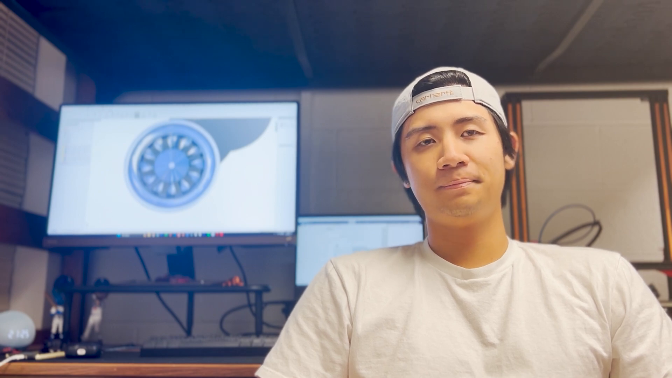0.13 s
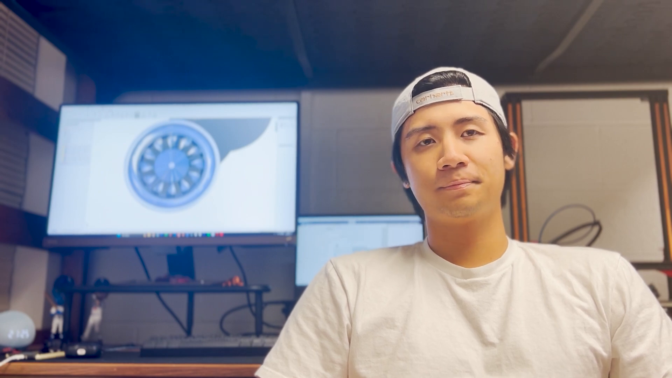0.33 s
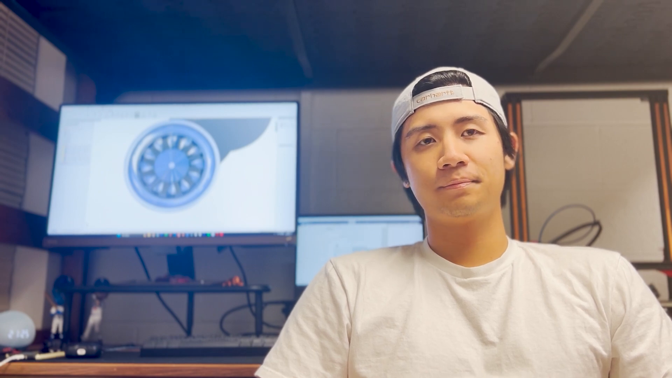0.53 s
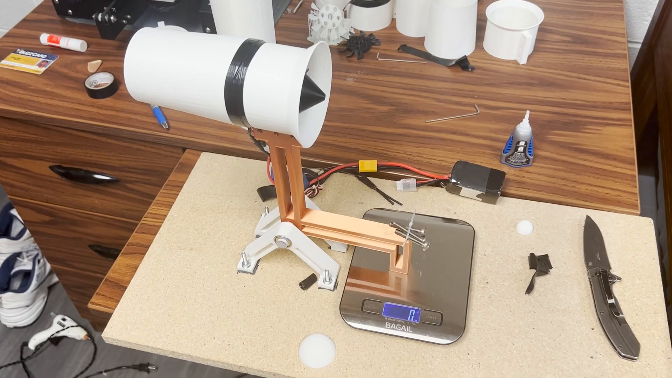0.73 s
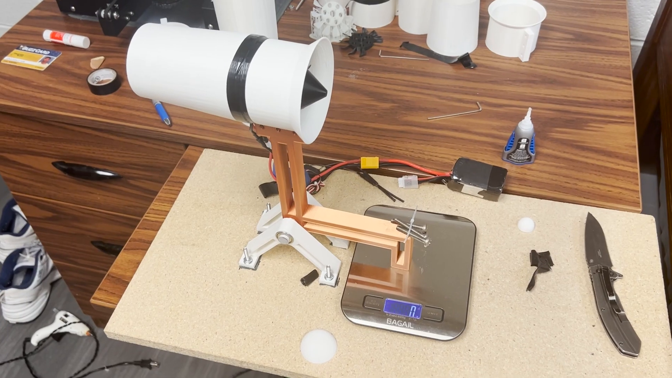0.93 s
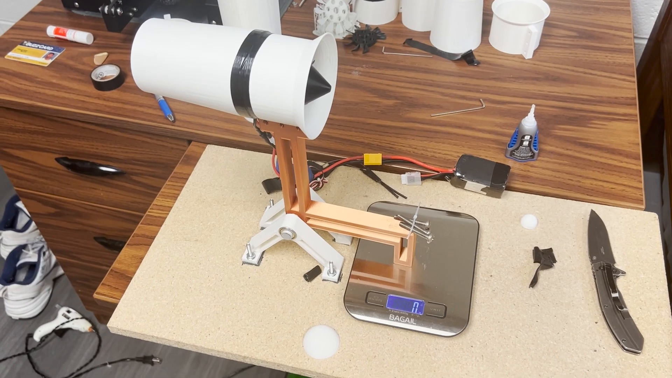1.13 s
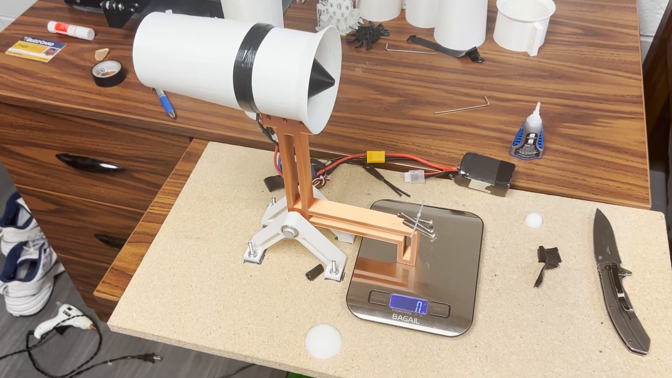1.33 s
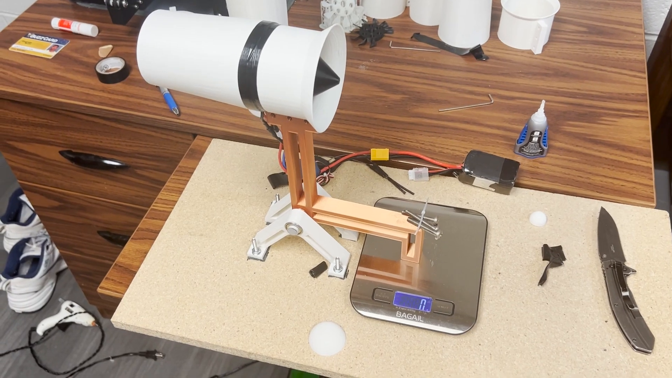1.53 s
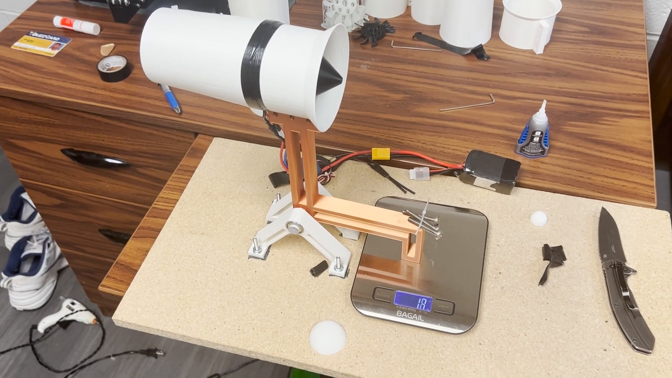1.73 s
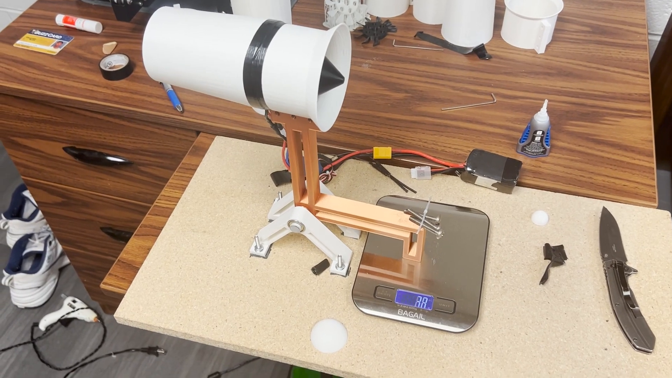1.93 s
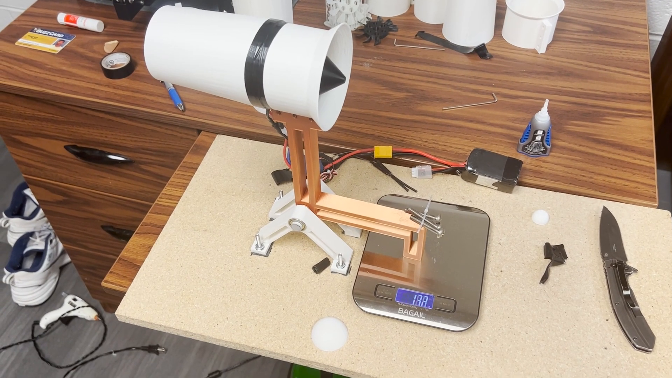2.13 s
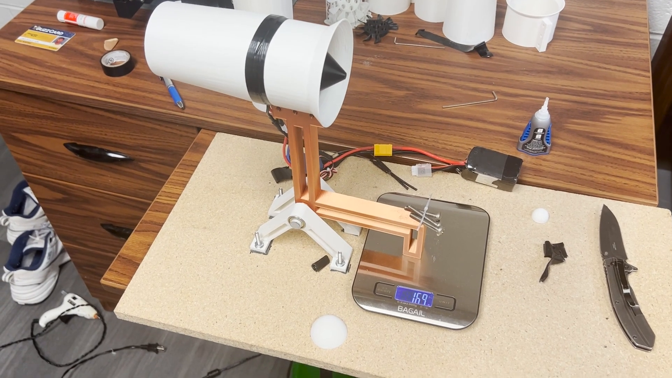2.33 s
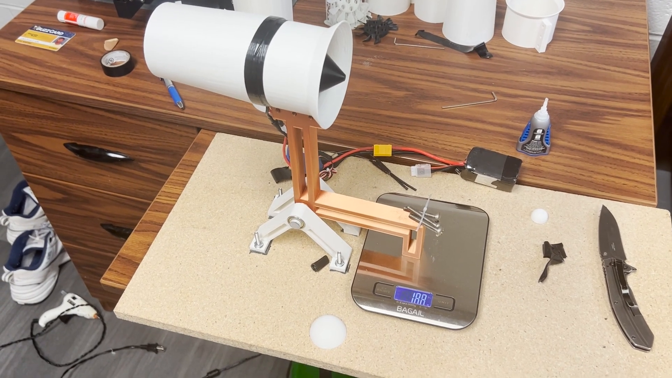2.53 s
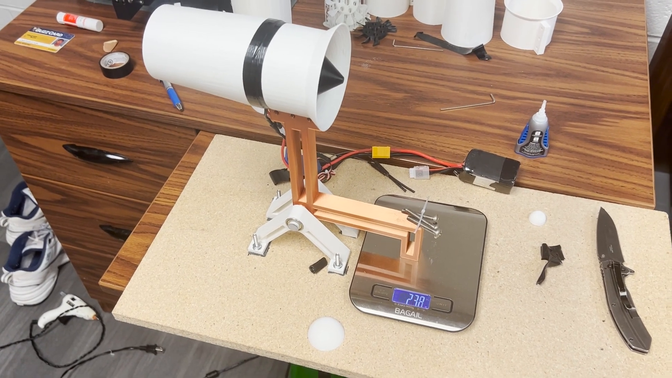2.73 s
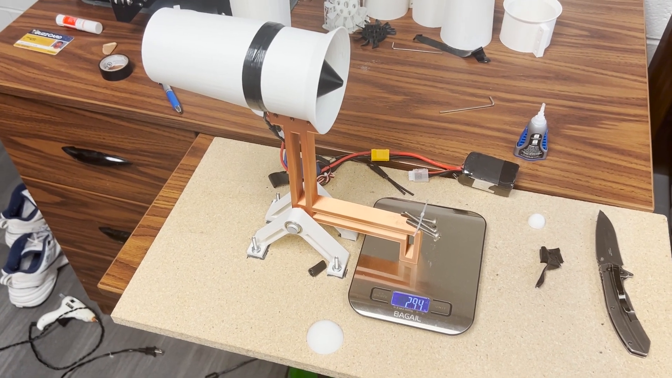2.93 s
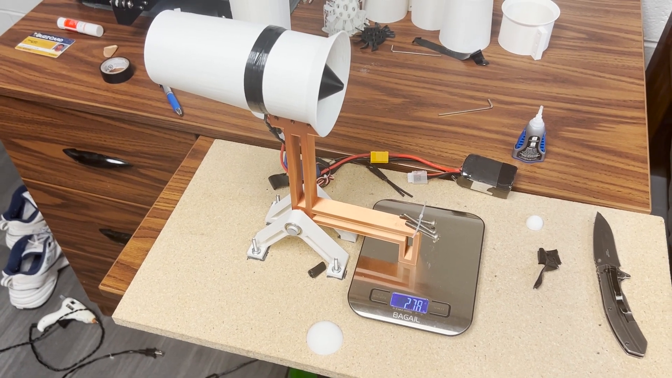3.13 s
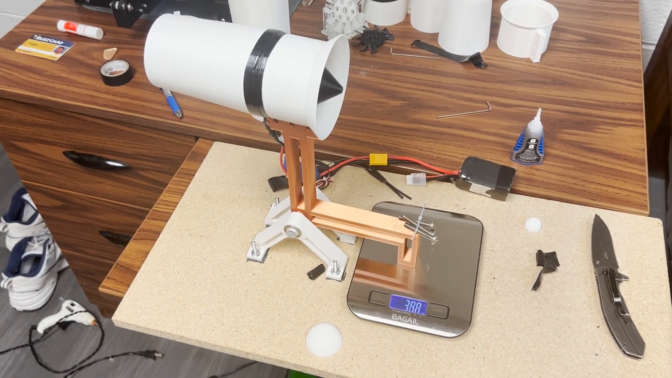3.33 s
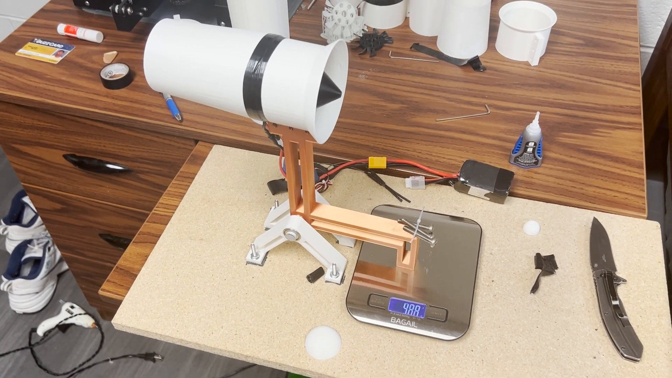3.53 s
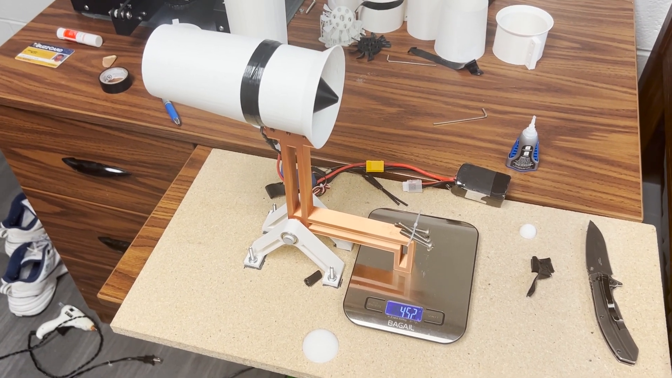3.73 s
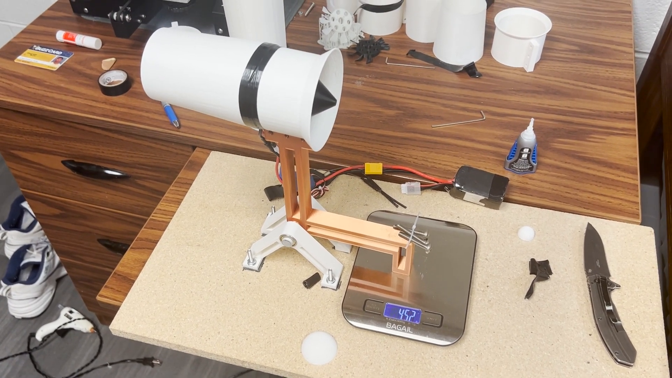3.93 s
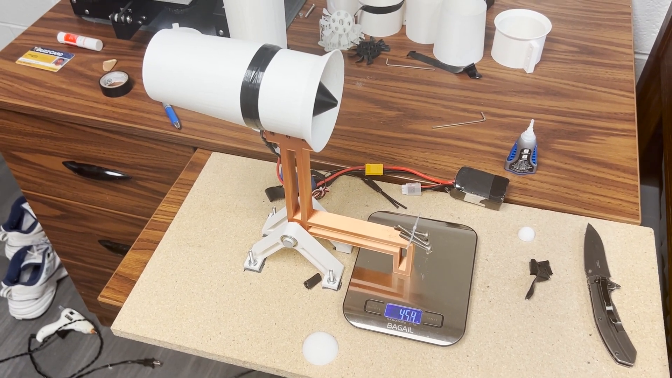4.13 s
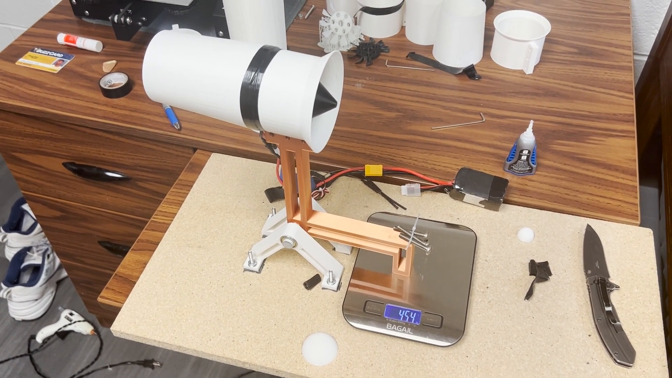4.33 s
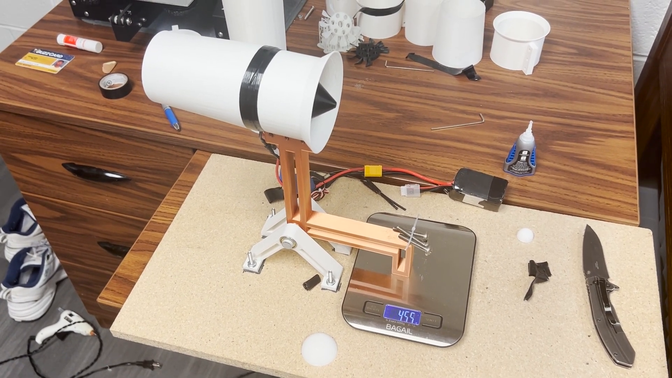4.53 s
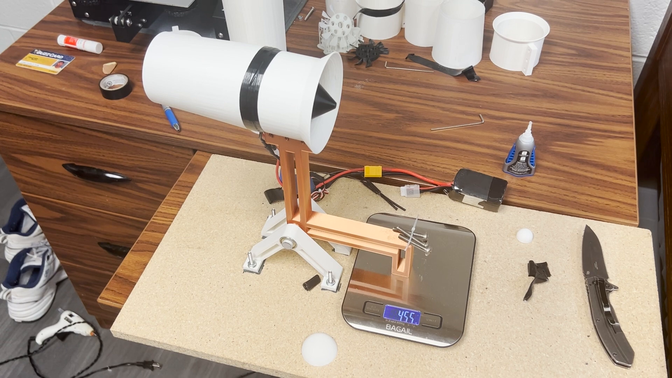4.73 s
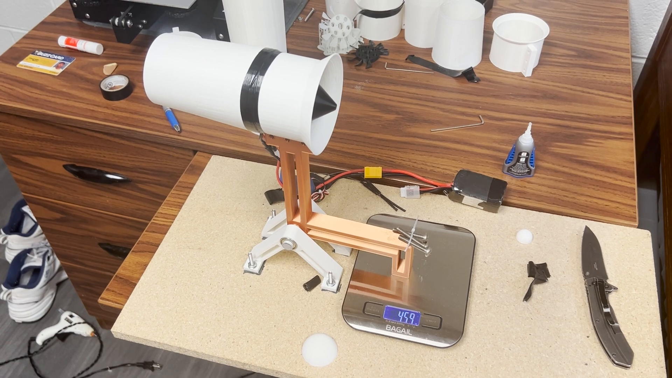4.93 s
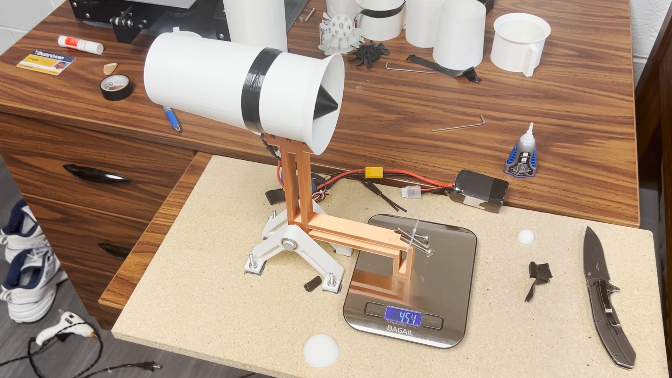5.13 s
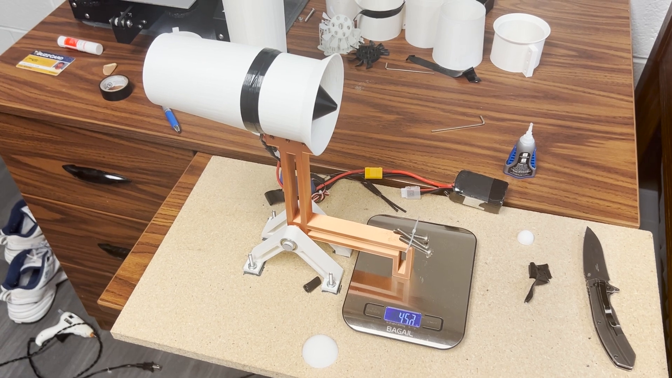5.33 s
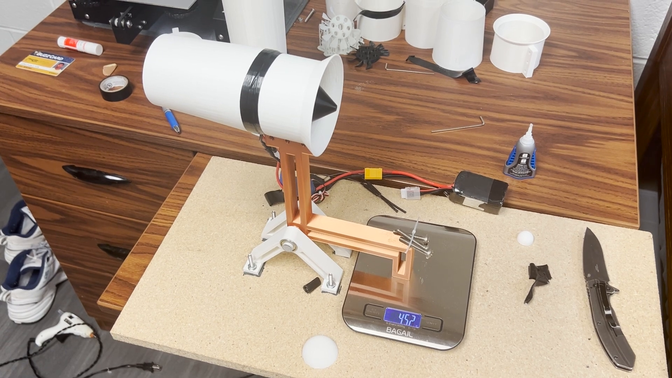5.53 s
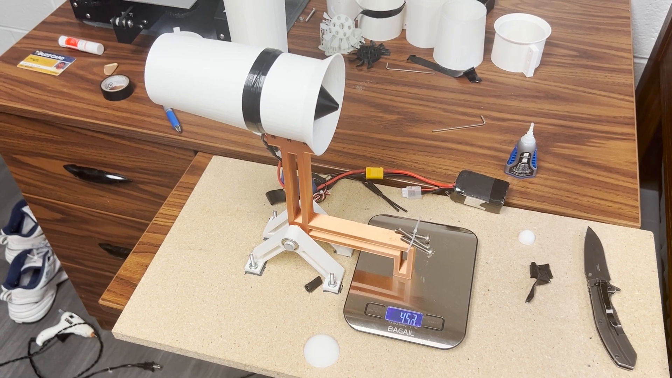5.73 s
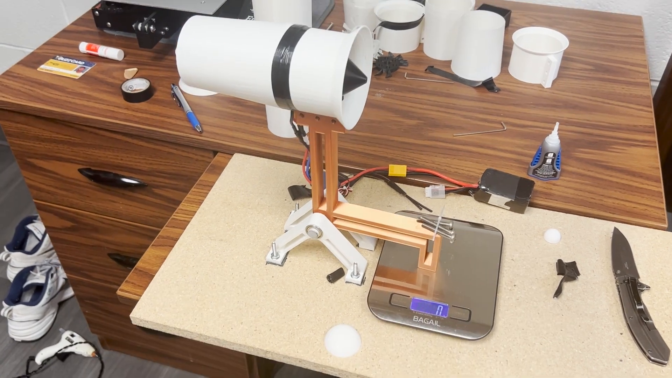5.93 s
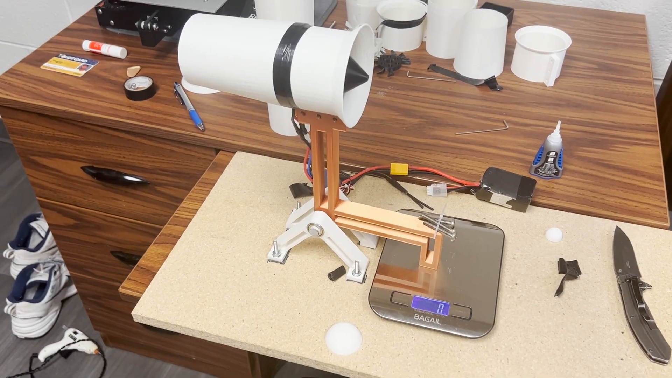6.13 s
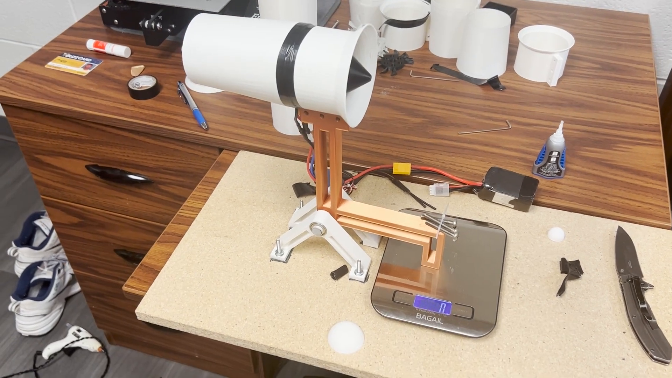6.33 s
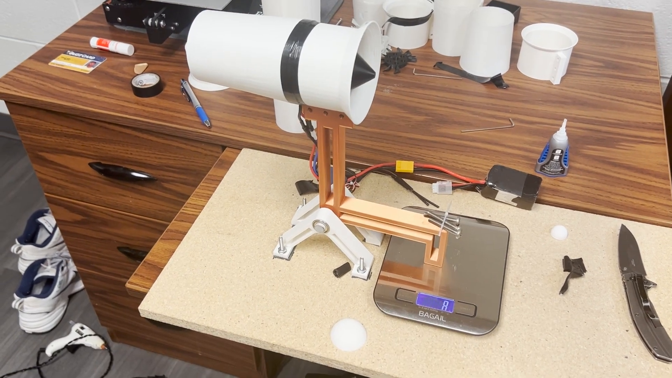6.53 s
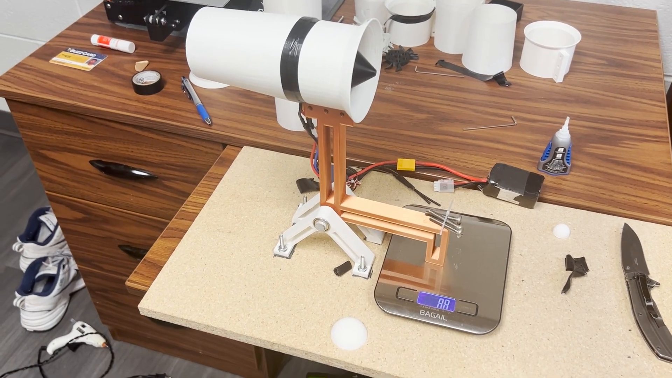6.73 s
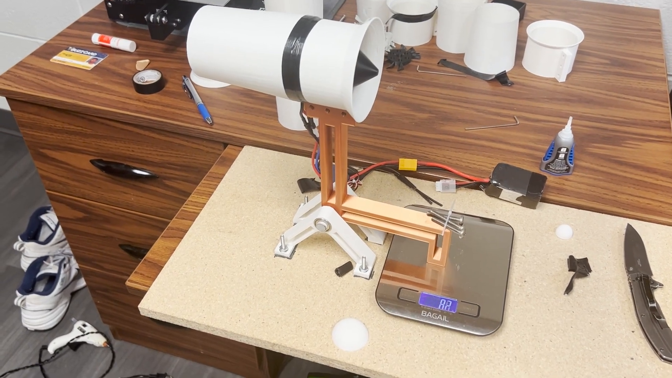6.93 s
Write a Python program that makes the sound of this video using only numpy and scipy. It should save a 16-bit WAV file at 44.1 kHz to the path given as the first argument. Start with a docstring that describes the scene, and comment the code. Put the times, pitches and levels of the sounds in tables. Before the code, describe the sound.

For the first 0.65 seconds there is only soft, low room air, then the fainter air of a workshop. At about 1.2 a small electric ducted fan jerks with a sharp crack, a metallic ping and a short stand rattle. Around 1.5 to 1.7 the motor sings in a fuzzy, bright chirp and a thin, very high electronic whistle joins. From 1.6 to 3.2 the pitch climbs unevenly, blade and magnet tones swelling through the plastic duct while hollow rushing air grows loud. From about 3.25 it holds a steady, piercing whine with broad hiss and slight rattle, easing a little in level. At 5.8 it cuts off abruptly into near silence. At about 6.0 a cluster of quick cracks and a shudder start it again, and fluttering chirps, whistle and whine rise until the end near 7. Close stereo microphone, indoors.

```python
"""On a workshop bench, after the still air of another room, a small electric ducted fan jerks into motion,
winds up to a steady whine and is cut off; after a short silence a second start begins.
Shaft, blade and magnet tones are sines at multiples of one speed curve; the motor controller adds a whistle
near 7.5 kHz and coil tones. Shaped noise makes the air that rings the plastic duct and the shaking stand.
A close pair of microphone ports hears it all."""
import sys
import numpy as np
from scipy import signal
from scipy.fft import rfft, irfft
from scipy.io import wavfile
from scipy.ndimage import uniform_filter1d

SR = 44100
rng = np.random.default_rng(int(sys.argv[2]) if len(sys.argv) > 2 else 0)


def master_out(mix):
    """Clip the mix to full scale and print it as 16-bit PCM to the path in sys.argv[1]."""
    frames = np.transpose(np.atleast_2d(mix))
    ceiling = np.clip(frames, -1, 1)
    pcm = np.round(ceiling * 32767).astype(np.int16)
    wavfile.write(sys.argv[1], SR, pcm)


N = 308259
HOP, SIZE = 256, 1024  # short-time spectra, in samples

# still air of the first room and of the workshop: frequency_hz, relative_density_db
FIRST_ROOM = [(15, -43), (25, -21), (106, -5.5), (249, -7.5), (358, -15), (418, -10.5), (615, -19),
              (682, -25), (1370, -24.5), (9270, -60.5), (12000, -73), (15600, -103), (22000, -120)]
WORKSHOP = [(15, -42.5), (25, -12), (134, -8.5), (174, -1.5), (665, -15.5), (756, -8.5), (861, -19),
            (1480, -16.5), (1640, -23.5), (2550, -27), (12000, -57), (15600, -91.5), (22000, -120)]
FIRST_ROOM_DB, WORKSHOP_DB = -43.5, -49  # overall levels
WORKSHOP_START_S = 0.65

# the two ports, level difference: frequency_hz, left_minus_right_db
PORT_BIAS = [(300, 0), (700, 0), (1300, -1.2), (2400, 0), (4400, -1), (8000, 0)]
# likeness of the fan's noise at the ports: frequency_hz, correlation (0-1)
PORT_LIKENESS = [(60, 0.96), (300, 0.95), (700, 0.79), (1700, 0.43), (2240, 1), (3300, 0.2), (4800, 0.28),
                 (5340, 0.11), (6400, 0.99), (7400, 0.21), (8000, 0.99), (12000, 0.96), (13000, 0.98),
                 (14400, 0.48)]
# phase difference of the ports: frequency_hz, left_lead_rad
PORT_LEAD = [(300, 0), (690, -.4), (1200, .3), (2240, 0), (3270, 1.6), (3800, 0), (4800, .3), (5800, -.4),
             (6900, .3), (7900, -1.1), (9500, -3), (10500, -3.6), (12550, -6.3), (13600, -6.3),
             (15200, -9.3)]
DIP_HZ, DIP_WIDTH_HZ, DIP_DB = 9950, 420, -24  # narrow dip near 10 kHz in the whole sound
BAND_EDGE_HZ = 15650

# spans in which the fan is heard: start_s, end_s
RUNS = [(1.214, 5.797), (5.968, 7.1)]
# shaft speed, one table a run: time_s, speed_hz
SPEED = [
    [(1.22, 17), (1.3, 41), (1.5, 72), (1.55, 92), (1.7, 163), (1.8, 192.3), (2.0, 202.5), (2.2, 216),
     (2.3, 231), (2.36, 239), (2.5, 242), (2.56, 251), (2.7, 263), (2.84, 261), (3.0, 285), (3.08, 298),
     (3.19, 331), (3.25, 332), (4.0, 330.7), (5.8, 330)],
    [(5.97, 10), (6.16, 27), (6.23, 61), (6.3, 83.5), (6.58, 141.3), (6.86, 186.4), (6.99, 199)],
]
BLADES, MAGNETS = 11, 14  # multiples of the shaft speed

# air, one table a run: time_s, reference_level_db, shedding_over_hiss_db, duct_ringing_db
# (the first level column is also the reference of the rotor and coil tones)
AIR = [
    [(1.21, -69, 5, 4), (1.22, -61, 5, -4), (1.23, -39, -9, -18), (1.29, -52, 9, -3), (1.49, -62, -24, 14),
     (1.61, -37.5, 20.5, -1.5), (2.0, -35, 9.5, 7), (2.17, -39, 11.5, 4.5), (2.32, -34, 8.5, 1.5),
     (2.86, -33.5, 10, 0.5), (3.09, -29, 8.5, 1), (3.73, -35, 4.5, -4.5), (5.52, -40, 6, 3.5),
     (5.79, -39.5, 4, 3), (5.8, -25, 13, -3)],
    [(5.96, -78, 8.5, -3), (5.97, -74, 5, 0), (5.98, -58, 8, 4), (5.996, -37, 3, -2),
     (6.07, -52.5, -3, -17), (6.318, -50, 10.5, 1), (6.576, -42, 19.5, 0.5), (6.696, -42, 17.5, 0),
     (6.99, -36.5, 13.5, 0)],
]
AIR_GAIN_DB = 11.5  # air noise over that reference
# colour of the hiss as heard, with a steep upper limit near 15 kHz: frequency_hz, relative_level_db
HISS = [(100, -14), (300, -9), (600, 5), (850, 15), (1200, 9), (1500, 8.5), (2800, 5.5), (4000, 8),
        (5500, 4.5), (6500, 6.5), (8500, 4.5), (9300, 8.5), (11000, 4), (13500, -1), (15000, -2.5),
        (15300, -35)]
# resonances of duct and motor bell: centre_hz, width_hz, relative_gain_db
DUCT = [(723.6, 120, -2.5), (863, 13, 5.5), (1057, 22, -13), (1800, 23.3, -7.5), (2381, 30, 14),
        (3000, 230, 2.5), (4390, 70, -7), (4920, 70, 0.5), (6100, 120, -2)]
# band of blade-tip shedding: centre in shaft turns, spread of log frequency, relative level in dB
SHED_MULTIPLE, SHED_SPREAD, SHED_DB = 6.21, 0.1, 11
# duct modes the shedding locks to: centre_hz, width_hz, gain_db
SHED_DUCT = [(853, 41, 13.5), (1078, 40, 4.5), (1756, 51, 7), (2034, 100, 3.5), (2395, 27, 19.5)]
# shaking of the stand, one table a run: time_s, rattle_level_db, rumble_level_db
SHAKE = [
    [(1.21, -16, -27), (1.26, -12, -19), (1.35, -27.5, -36), (1.61, -19, -24), (2.2, -19.5, -35),
     (2.8, -15.5, -33), (3.66, -21, -40), (4.4, -26.5, -51), (4.48, -25, -27), (5.2, -22.5, -46),
     (5.8, -25, -50)],
    [(5.96, -23, -32), (6.048, -11, -10), (6.12, -13, -25), (6.222, -29, -32), (6.44, -19, -24),
     (6.754, -24, -36), (6.99, -15, -31)],
]
# colours of rattle and rumble: frequency_hz, relative_level_db
RATTLE = [(150, -17), (320, -5), (570, -3.5), (900, -10), (2500, -19.5), (5000, -24)]
RUMBLE = [(25, -25), (60, -13.5), (90, 11), (200, -13), (300, -18.5), (500, -37)]

# resonances crossed by the shaft, blade and magnet tones: centre_hz, width_hz, gain_over_reference_db
SHAFT_MODES = [(97, 38, 6), (129, 23, 2.5), (186.8, 8, 2), (206.4, 14, 6), (241, 7.1, 3.5), (261, 2.7, 0),
               (296, 27.9, 9.5), (318.2, 16.5, 16), (329.4, 14, 6)]
BLADE_MODES = [(2098, 60, 5.6), (2243, 200, 13.2), (2369, 87, 26), (2550, 28.2, 11), (3037, 113, 20.3),
               (3290, 330, 7), (3641, 27, 10)]
MAGNET_MODES = [(2300, 330, 1), (3700, 100, 3), (4400, 400, 1.5), (4632, 45, 13)]
# weaker multiples from imbalance and uneven blades:
# shaft_multiple, level_over_reference_db at full speed, before resonance
OVERTONES = list(zip([2, 3, 4, 9, 10, 12, 13, 21], [2, 2, 0, -1, -4, -3, -5, -5]))
# stand and duct modes that lift the weak multiples: centre_hz, width_hz, gain_db
LIFT = [(527, 22, 4.5), (618, 23, 8.5), (760, 42, 12), (920, 53, 12), (1063, 19, 13.5), (1185, 95, 9)]

# switching whistle, one table a run: time_s, level_db
WHISTLE = [
    [(1.508, -27), (1.58, -12), (1.65, -22), (1.72, -18.5), (1.82, -20.5), (1.975, -33.5), (2.46, -43),
     (2.57, -26.5), (2.9, -42)],
    [(6.15, -31), (6.2, -26), (6.32, -31.5), (6.434, -22), (6.6, -19), (6.66, -24), (6.775, -32.5),
     (6.836, -22.5), (6.99, -28.5)],
]
WHISTLE_START_HZ = [7766, 7808]  # one a run: start_hz
SAG_HZ, SAG_POWER = 155, 0.52  # battery sag of the pitch: fall in Hz after one second, exponent of time
# resonances of the whistle's lower magnet sideband: centre_hz, width_hz, gain_over_reference_db
SIDEBAND = [(4260, 88, 13.7), (4680, 170, 7), (5980, 770, 9.3)]
SPURS_DB = -14.5  # faint copies of that sideband, two to five shaft turns higher
# coil tones: (whistle_multiple, shaft_multiple), level_over_reference_db before fade and resonance
COILS = list(zip([(0, 28), (0, 42), (1, 42), (2, -42), (2, 0)], [-8, -5, 0, -2, 2]))
# motor housing modes that lift the coil tones: centre_hz, width_hz, gain_db for one passage
HOUSING = [(2500, 400, 9), (4390, 90, 19), (6200, 1500, 5)]

# singing of the motor bell: start_s, end_s, least_level_db, flutter_power_share (0-1)
BELL = [(1.216, 1.48, -47, .65), (1.507, 1.76, -31, 0.1), (6.04, 6.8, -38.5, 0.55)]
# flares of the bell: peak_time_s, peak_level_db, rise_db_per_s, fall_db_per_s
FLARES = [(1.24, -28, 900, 92), (1.545, -17.5, 329, 700), (1.609, -10, 449, 400), (6.245, -30, 100, 200),
          (6.316, -26, 300, 150), (6.446, -26.5, 150, 200), (6.64, -27.5, 100, 150)]
BELL_HZ, BELL_CLIMB = 4550, 1.2  # pitch at rest, and its rise in Hz per Hz of shaft speed

# shudders of the stand: start_s, length_s, level_db before the fades
SHUDDERS = [(1.219, 0.057, -28.5), (6.0, 0.1, -33.5), (6.075, 0.091, -24)]
# stand resonances: centre_hz, width_hz, gain_db for one of two passages
STAND = [(88, 11, 0.5), (196, 30, -1.5), (328.4, 5.7, 7), (580, 85, 0.5)]
# jerks of the rotor as the coils first pull: start_s, ping_scale_db, ping_hz, crack_start_db
JERKS = [(1.2395, -2, 7940, -22.5), (5.9833, -6.5, 8030, -28), (5.9942, -5, 8430, -23),
         (6.0072, -8, 8200, -20), (6.0294, -16, 7710, -27)]


def amp(db):
    """Decibel law: level to amplitude ratio."""
    return 10 ** (np.asarray(db) / 20)


def evened(x):
    """Power normalisation: scales to rms 1."""
    return x / np.sqrt(np.mean(x ** 2) + 1e-20)


def read(points, hz):
    """Interpolation of a spectrum along a logarithmic frequency axis."""
    f, value = np.transpose(points)
    return np.interp(np.log(hz + 1), np.log(f + 1), value)


def follow(rows, t):
    """Linear interpolation in time of every column after the first."""
    s, *columns = np.transpose(rows)
    return [np.interp(t, s, column) for column in columns]


def peaks(modes, hz):
    """Resonance: the power responses of simple damped modes add."""
    return np.sqrt(sum(amp(db) ** 2 / (1 + (2 * (hz - f) / w) ** 2) for f, w, db in modes))


def steep(modes, hz):
    """Resonance with steep flanks: each mode's amplitude, not power, follows the bell curve."""
    return np.sqrt(sum((amp(db) / (1 + (2 * (hz - f) / w) ** 2)) ** 2 for f, w, db in modes))


def grid():
    """Short-time analysis: frequencies (column) and frame times (row)."""
    return np.fft.rfftfreq(SIZE, 1 / SR)[:, None], np.arange(N // HOP + 5) * HOP / SR


def noise(gain, same, patchy_db):
    """Partial coherence: two-port noise of given short-time magnitude; gain 1 is white of about rms 1."""
    hz, t = grid()
    a, b, c, d, patches = rng.standard_normal((len(t), len(hz), 5)).T
    # smoothing over frequency and time leaves drifting patches
    patches = uniform_filter1d(patches, size=10, axis=0)
    patches = evened(uniform_filter1d(patches, size=12, axis=1))
    left = a + 1j * b
    shared = same * left * np.exp(-1j * read(PORT_LEAD, hz))
    right = shared + np.sqrt(1 - same ** 2) * (c + 1j * d)
    white_rms = np.std(signal.istft(left, nperseg=SIZE, noverlap=SIZE - HOP)[1])
    half_bias = amp(read(PORT_BIAS, hz) / 2)
    spectra = np.array([left * half_bias, right / half_bias]) * gain * amp(patchy_db * patches) / white_rms
    return signal.istft(spectra, nperseg=SIZE, noverlap=SIZE - HOP)[1][:, :N]


def tone(hz, db, waver_db=0.5):
    """Phase accumulation: a sine follows a pitch curve, wavers in level and reaches the ports out of phase."""
    slow = rng.standard_normal((N // HOP + 2, 2))
    slow = evened(uniform_filter1d(slow, size=4, axis=0)).T
    frames, position = np.arange(slow.shape[1]), np.arange(N) / HOP
    # a common waver plus a part added at each port
    waver = np.array([np.interp(position, frames, slow[0] + 0.51 * own) for own in slow])
    phase = 2 * np.pi * (np.cumsum(hz) / SR + rng.random())
    half_lead = read(PORT_LEAD, abs(hz)) / 2
    return np.sqrt(2) * amp(db + waver_db * waver) * np.sin([phase + half_lead, phase - half_lead])


def shaft(t):
    """Rotation rate: shaft speed in Hz, the fundamental of the rotor tones."""
    return follow(SPEED[0] + SPEED[1], t)[0]


def reference(t):
    """Common reference level in dB to which the air and most tones are tied."""
    return follow(AIR[0] + AIR[1], t)[0]


def running(t):
    """Gating: 1 while the fan is heard, with edges of about 8 ms."""
    return sum(np.clip((t - a) / 0.0075, 0, 1) * np.clip((b - t) / 0.0081, 0, 1) for a, b in RUNS)


def during(start, end, t):
    """Gating: 1 between two times, with 4 ms edges inside them."""
    return np.clip((t - start) / 0.004, 0, 1) * np.clip((end - t) / 0.004, 0, 1)


def room_air(shape, db, hz):
    """Spectral density: magnitude of a noise with the given colour and overall level."""
    density = amp(read(shape, hz))
    return amp(db) * density / np.sqrt(np.mean(density ** 2))


def rooms():
    """Diffuse field: faint air of one room, then the workshop; only its bass is alike at both ports."""
    hz, t = grid()
    first, workshop = room_air(FIRST_ROOM, FIRST_ROOM_DB, hz), room_air(WORKSHOP, WORKSHOP_DB, hz)
    gain = np.where(t < WORKSHOP_START_S, first, workshop)
    return noise(gain, read([(200, 0.93), (700, 0.11)], hz), patchy_db=1.0)


def air():
    """Turbulence and vortex shedding: hiss and a speed-following band ring the duct; the stand shakes."""
    hz, t = grid()
    level_db, shed_db, ring_db = follow(AIR[0] + AIR[1], t)
    rattle_db, rumble_db = follow(SHAKE[0] + SHAKE[1], t)
    log_ratio = np.log((hz + 1) / (SHED_MULTIPLE * shaft(t)))
    shed = amp(SHED_DB + shed_db) * np.exp(-0.5 * (log_ratio / SHED_SPREAD) ** 2)
    shed = shed * np.hypot(1, peaks(SHED_DUCT, hz))
    hiss = amp(read(HISS, hz)) * np.hypot(1, amp(ring_db) * peaks(DUCT, hz))
    flow = amp(level_db + AIR_GAIN_DB) * np.hypot(hiss, shed)
    rattle = amp(rattle_db + read(RATTLE, hz))
    rumble = amp(rumble_db + read(RUMBLE, hz))
    stand = np.hypot(rattle, rumble)
    return noise(np.hypot(flow, stand), read(PORT_LIKENESS, hz), patchy_db=1.5)


def rotor(t):
    """Harmonics of rotation: multiples of the shaft speed swell where they cross a resonance."""
    speed, level_db = shaft(t), reference(t)
    out = np.zeros((2, N))
    main_tones = [(1, SHAFT_MODES, 0.55), (BLADES, BLADE_MODES, 1.2), (MAGNETS, MAGNET_MODES, 1.1)]
    for multiple, modes, waver_db in main_tones:
        out += tone(multiple * speed, level_db, waver_db) * steep(modes, multiple * speed)
    load_db = 70 * np.log10(speed / speed.max())  # imbalance forces grow steeply with speed
    for multiple, db in OVERTONES:
        hz = multiple * speed
        out += tone(hz, level_db + db + load_db, 1.32) * np.hypot(1, steep(DUCT + LIFT, hz))
    return out


def controller(t):
    """Modulation: passing magnets give the switching whistle sidebands; coil tones fade as current evens out."""
    speed, level_db = shaft(t), reference(t)
    out = np.zeros((2, N))
    # before the whistle sets in, one coil tone creeps up alone
    for (run_start, _), rows in zip(RUNS, WHISTLE):
        lone_tone = tone(42 * speed, level_db - 1, 3) * peaks(HOUSING, 42 * speed) ** 2
        out += during(run_start, rows[0][0], t) * lone_tone
    coil_db = level_db - 0.3 * np.maximum(speed - 180, 0)  # 0.3 dB per Hz above 180 Hz
    for rows, start_hz in zip(WHISTLE, WHISTLE_START_HZ):
        start, end = rows[0][0], rows[-1][0]
        hz = start_hz - SAG_HZ * np.maximum(t - start, 0) ** SAG_POWER
        side_hz = hz - MAGNETS * speed
        parts = tone(hz, follow(rows, t)[0], 1.56)
        parts += tone(side_hz, level_db, 2.0) * steep(SIDEBAND, side_hz)
        for k in range(2, 6):
            parts += tone(side_hz + k * speed, level_db + SPURS_DB, 2.5) * steep(SIDEBAND[:1], side_hz)
        # strong only while the rotor is slow: falls 1 dB per Hz above 82 Hz
        parts += tone(hz - 21 * speed, level_db + 6 - np.maximum(speed - 82, 0), 2)
        for (whistle_multiple, shaft_multiple), db in COILS:
            coil_hz = whistle_multiple * hz + shaft_multiple * speed
            parts += tone(coil_hz, coil_db + db, 2.5) * np.hypot(1, peaks(HOUSING, coil_hz))
        out += during(start, end, t) * parts
    return out


def bell(t):
    """Random amplitude modulation: strength and sign flutter, smearing the bell's tone into a fuzzy band."""
    out = np.zeros((2, N))
    hz = BELL_HZ + BELL_CLIMB * shaft(t)
    flares = [db - np.maximum(rise * (s - t), fall * (t - s)) for s, db, rise, fall in FLARES]
    flare_db = np.max(flares, axis=0)
    for start, end, db, share in BELL:
        flutter = uniform_filter1d(rng.standard_normal(N), size=130)
        flutter = evened(uniform_filter1d(flutter, size=130))
        strength = np.sqrt(1 - share) + np.sqrt(share) * flutter
        out += during(start, end, t) * strength * tone(hz, np.maximum(db, flare_db))
    return out


def starts():
    """Impulse response: jerks ping the motor bell and crack; shudders of noise ring the stand."""
    out = np.zeros((2, N))
    for s, length, db in SHUDDERS:
        n = round(length * SR)
        spectrum = rfft(rng.standard_normal(8192))
        ringing = peaks(STAND, np.fft.rfftfreq(8192, 1 / SR)) ** 2  # two passages
        shake = evened(irfft(spectrum * ringing))
        out[:, round(s * SR):][:, :n] += amp(db) * shake[:n] * signal.windows.tukey(n, 0.5)
    u = np.arange(1500) / SR  # seconds since the jerk
    port_phase = np.array([[-0.6], [0.6]])
    for s, db, hz, crack_db in JERKS:
        swell = (u / 0.00068) * np.exp(1 - u / 0.00054)
        ping = amp(db) * swell * np.sin(2 * np.pi * hz * u + port_phase)
        crack = rng.standard_normal((2, len(u)))
        crack = crack[0] + 0.5 * crack  # mostly common to both ports
        decay = amp(crack_db - 60 * u / 0.06)  # falls at 60 dB per 60 ms
        out[:, round(s * SR):][:, :len(u)] += ping + decay * crack
    return out


def scene():
    """Superposition: the gated fan and its starts over room air."""
    t = np.arange(N) / SR
    fan = air() + rotor(t) + controller(t) + bell(t)
    return rooms() + running(t) * fan + starts()


def record(dry):
    """Linear filtering and saturation: narrow dip near 10 kHz, bass cut, overload at full scale, band limit."""
    hz = np.linspace(0, SR / 2, 513)
    dip_gain = amp(DIP_DB * np.exp(-((hz - DIP_HZ) / DIP_WIDTH_HZ) ** 4))
    dip = signal.firwin2(511, hz, dip_gain, fs=SR)
    bass_cut = signal.butter(3, 50, "high", fs=SR, output="sos")
    coloured = signal.sosfilt(bass_cut, signal.oaconvolve(dry, dip[None], "same"))
    overloaded = np.clip(coloured, -1, 1)
    edge = signal.firwin(511, BAND_EDGE_HZ, window=("kaiser", 9), fs=SR)
    return np.clip(signal.oaconvolve(overloaded, edge[None], "same"), -1, 1)


dry = scene()
out = record(dry)
master_out(out)
```